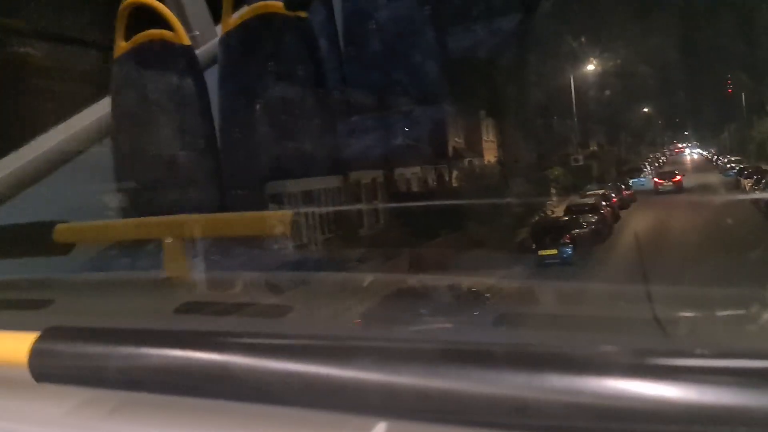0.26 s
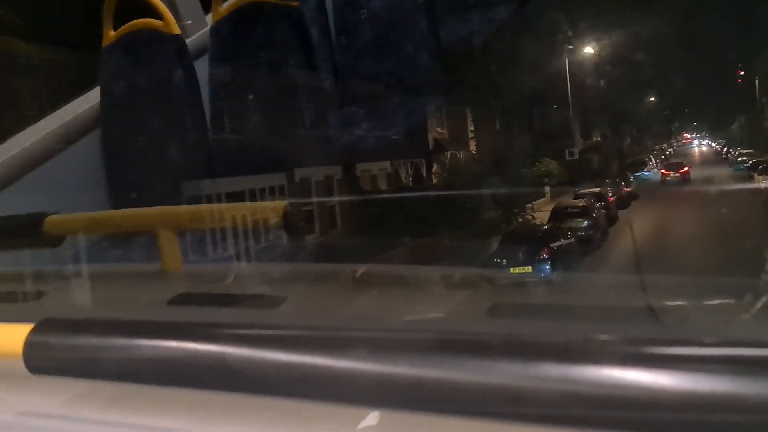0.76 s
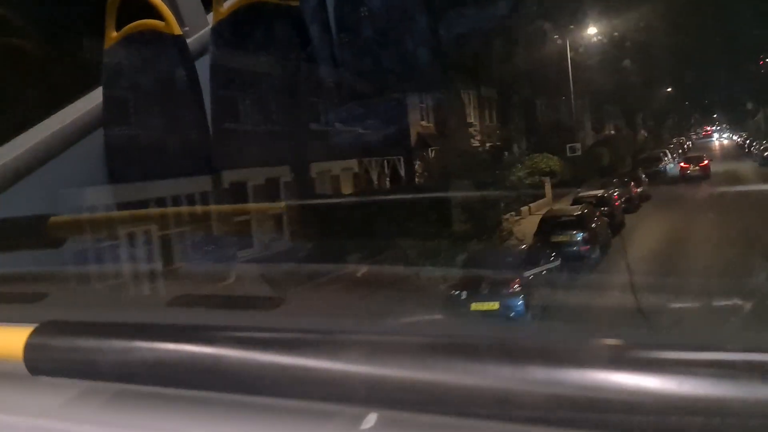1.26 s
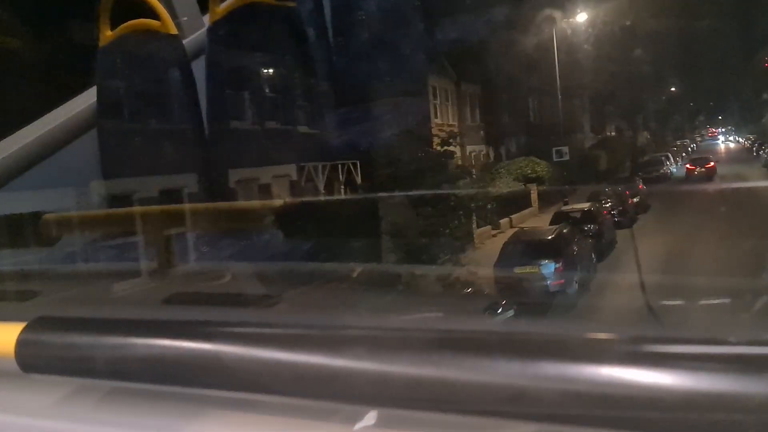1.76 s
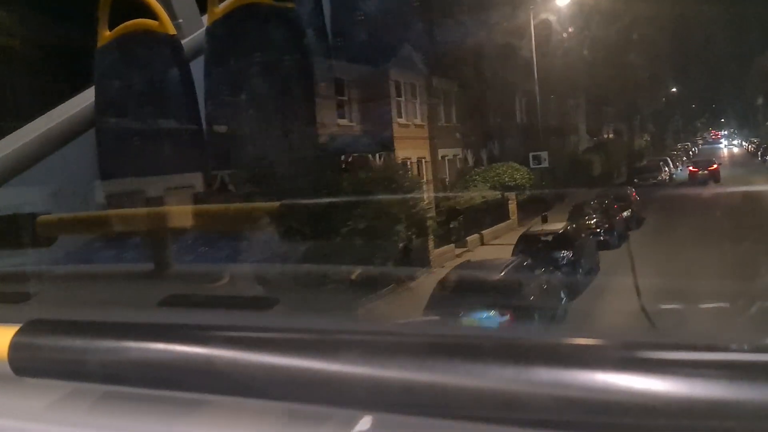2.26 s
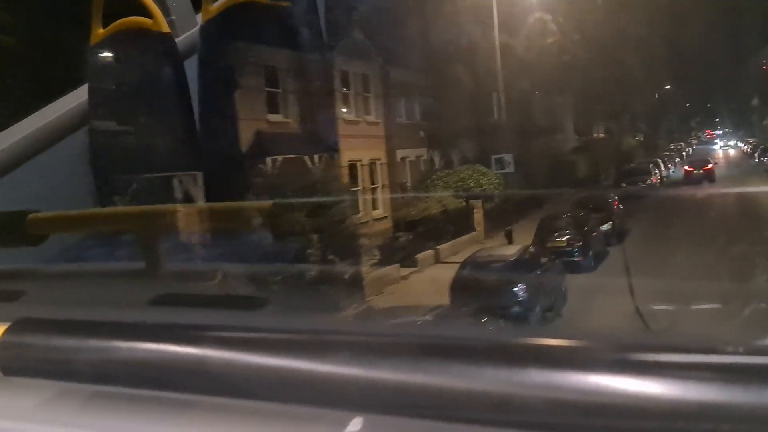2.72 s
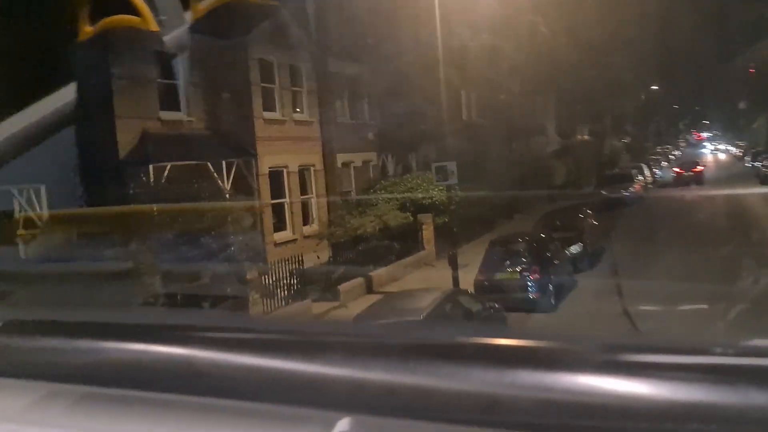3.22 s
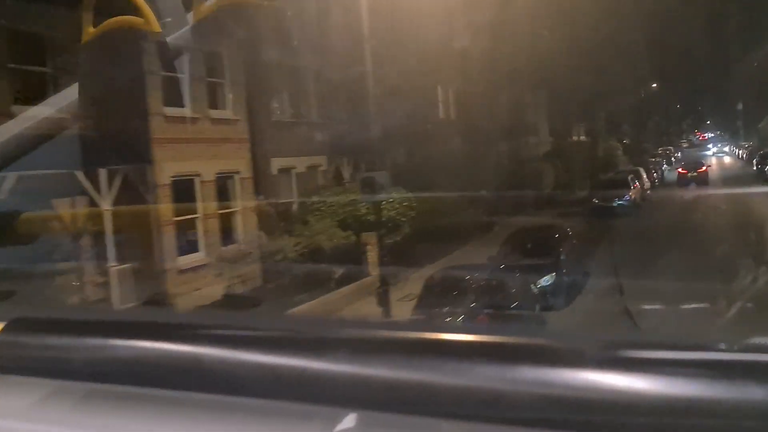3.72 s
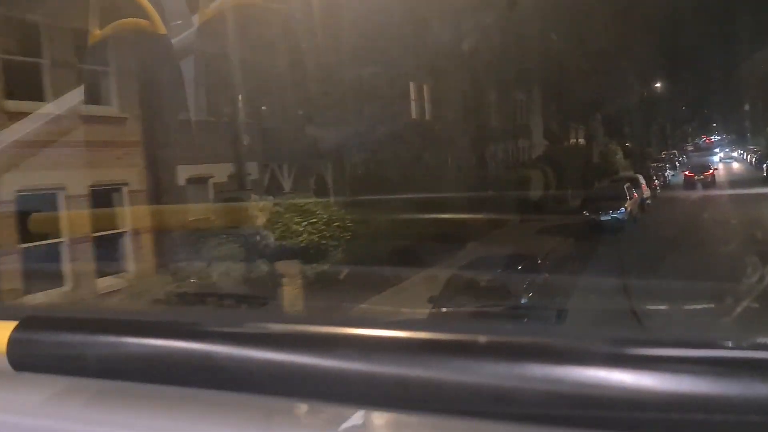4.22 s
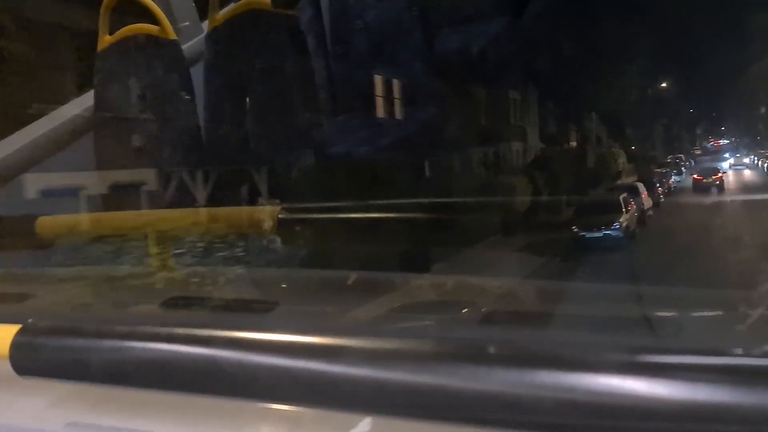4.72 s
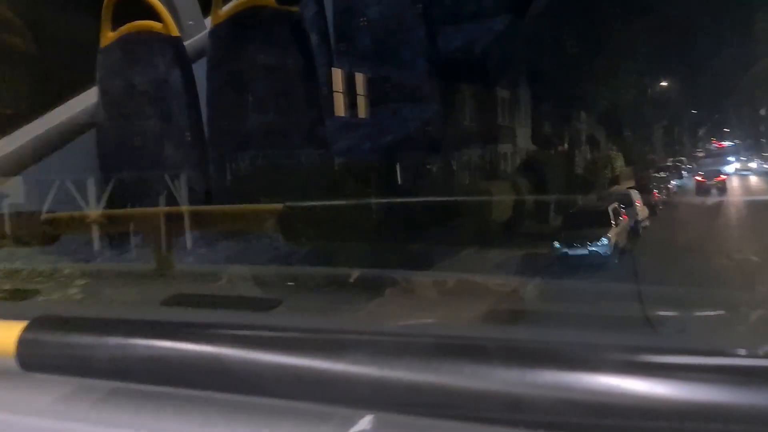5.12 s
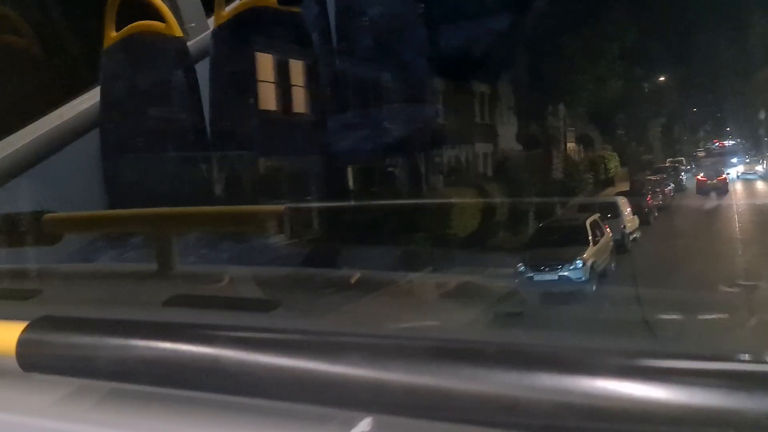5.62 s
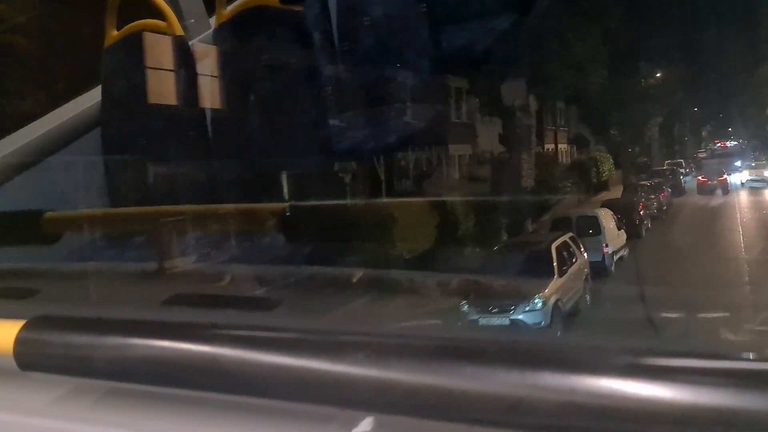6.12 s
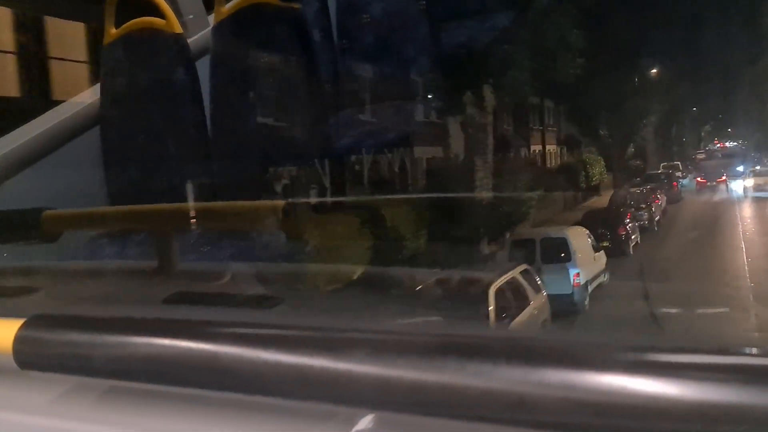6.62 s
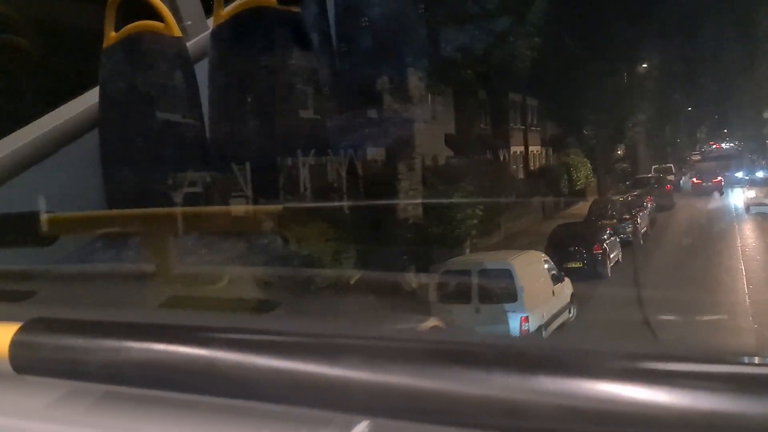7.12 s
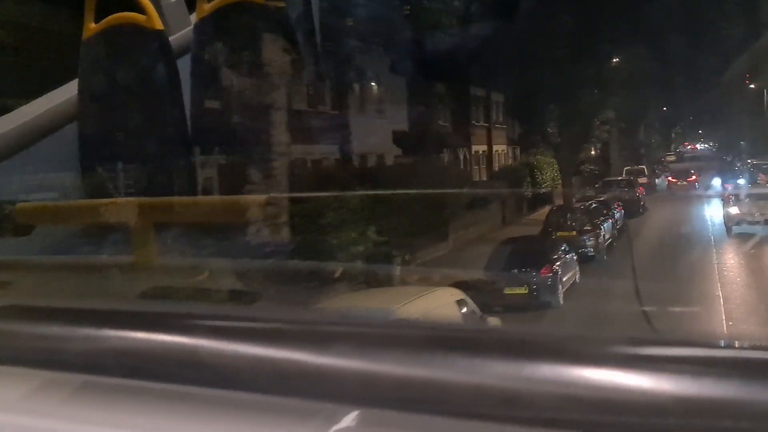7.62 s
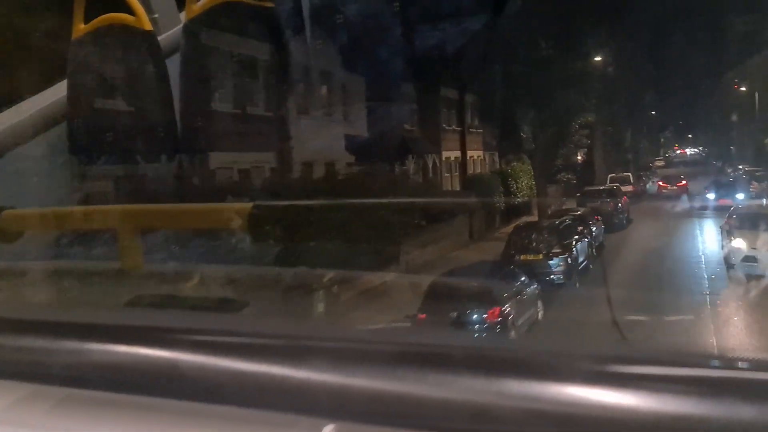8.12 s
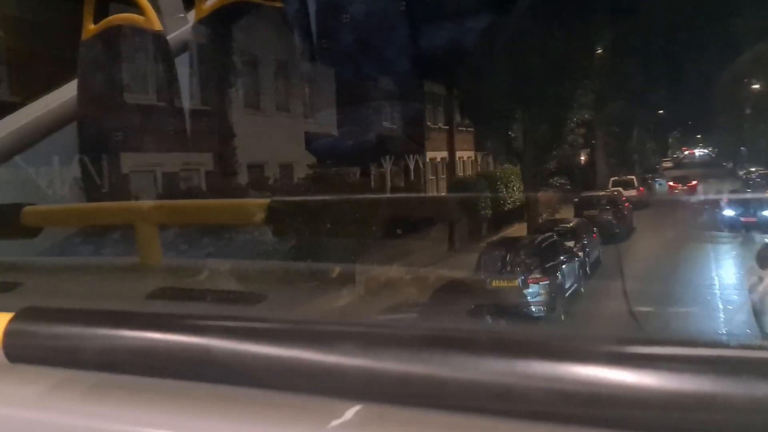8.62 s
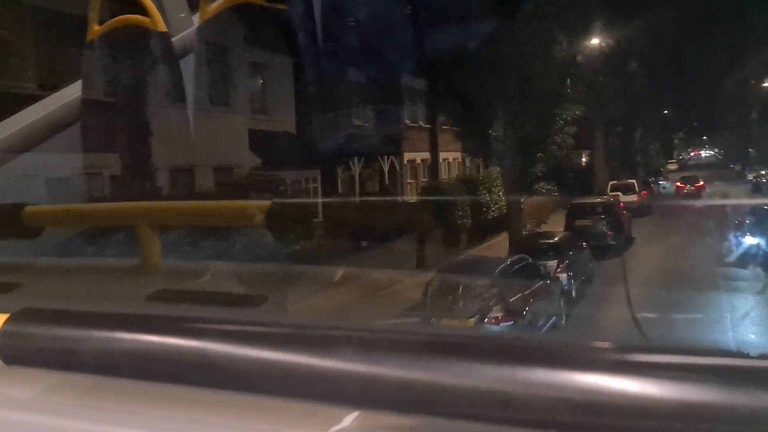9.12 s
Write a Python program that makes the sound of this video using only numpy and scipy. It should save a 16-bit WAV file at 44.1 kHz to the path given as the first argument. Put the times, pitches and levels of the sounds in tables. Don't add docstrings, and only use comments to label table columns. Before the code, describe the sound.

A bus engine and road rumble drone deep and steady inside the upper deck, pitch sagging in steps, with loose panels rattling and soft floor thuds.

```python
import sys
import numpy as np
from scipy import signal
from scipy.io import wavfile
from scipy.ndimage import uniform_filter1d

SR = 44100
rng = np.random.default_rng(int(sys.argv[2]) if len(sys.argv) > 2 else 0)


def dump_mix(stems):
    frames = np.atleast_2d(stems).T
    limited = np.clip(frames, -1, 1)
    pcm = np.round(limited * 32767).astype(np.int16)
    wavfile.write(sys.argv[1], SR, pcm)


def boost_factor(decibels):
    exponent = np.asarray(decibels, float) / 20
    return 10 ** exponent


N = 412776

# (time [s], firing rate [Hz], load [dB], cylinder unevenness [dB])
ENGINE_RUN = [(.15, 50.44, 0.5, -10), (.38, 46.9, -0.5, -14), (.9, 49.24, 0, 3), (1.35, 48.74, 0, -6),
              (1.7, 46.22, -0.5, -10), (2.0, 42.1, 0, -10), (2.62, 42.9, -0.5, -8), (2.9, 41.1, -2.5, -3),
              (3.22, 32.84, 4, -8), (3.55, 29.59, -1, -16), (3.95, 31.2, 4, -6), (4.8, 36.58, -4.5, -5),
              (6.15, 36.58, 2, -8), (6.58, 29.04, 0, -32), (7.1, 29.34, 1, -1), (7.5, 27.4, -0.5, -4),
              (9.0, 28.08, -4.5, 7), (9.36, 30.48, 2.5, 2.5)]
# (frequency [Hz], level [dB])
BODY_RESPONSE = [(15, -42), (24, -21), (30, -14.5), (35.5, -29), (41, -24), (46, -14), (50, -14),
                 (62, -24.5)]
# (multiple of firing rate [1], level [dB], share of unevenness [1])
ENGINE_ORDERS = [
    (.5, -10, 1),
    (1.5, -13, 1),
    (2, -12, .4),
    (3, -13, .6),
]
# (time [s], drone level [dB], panel buzz level [dB])
FAN_LEVELS = [(0, -25.5, -36), (.7, -27.5, -43.5), (1.4, -44, -53), (1.8, -25, -53), (2.3, -27, -36),
              (2.52, -33, -39), (2.95, -23.5, -39), (3.9, -26.5, -47), (5.2, -23, -44.5), (6.2, -23.5, -57),
              (6.7, -26, -36), (7.2, -22, -40), (8.0, -23.5, -37.5), (8.9, -25.5, -40.5),
              (9.36, -17.5, -51)]

# (time [s], force [dB], latch crispness [dB])
PANEL_RATTLES = [(.078, -38, -4), (0.238, -33.5, 2), (0.308, -42, 10.5), (.67, -34, 2), (.713, -37.5, -10),
                 (1.042, -35.5, 0), (1.3692, -34.5, 2), (3.05, -36, 3.5), (3.083, -46.5, -3),
                 (3.138, -39.5, 4), (3.2886, -34.5, -5), (3.504, -36, 1), (3.631, -34.5, -1),
                 (4.762, -34, 2), (5.177, -39.5, 3), (5.415, -33.5, 3), (5.699, -36.5, -5), (5.967, -31, 1),
                 (6.639, -41, 1), (7.278, -31, 2.5), (7.996, -44, -4), (8.0721, -34, 0),
                 (8.4193, -35.5, -2), (8.675, -38, -1), (8.782, -34.5, 2)]
# (time [s], force [dB], latch crispness [dB])
FLOOR_BUMPS = [
    (1.12, -29, 2),
    (2.838, -25.5, -8),
    (6.314, -30, 2),
    (6.573, -28, 13),
    (9.0193, -30, -1),
]
# (time [s], force [dB], latch crispness [dB])
LIGHT_CLICKS = [
    (2.2494, -41, -1),
    (7.4979, -47, -1),
    (8.3104, -44, 1),
]
# (panel [dB], floor [dB], latch over force [dB], chatter length [s])
STRIKE_KINDS = [
    (-2.5, 3, -16.5, 0.028),
    (-16.5, -2.5, -38, .022),
    (-9, -3, -7, 0.0025),
]
# (frequency [Hz], width [Hz], level [dB])
PANEL_MODES = [(1437, 35, -3), (1830, 110, 1), (2170, 90, 2), (2475, 50, -3), (3010, 200, -3),
               (3950, 300, -8), (5220, 200, -5), (6650, 600, -8)]
# (frequency [Hz], width [Hz], level [dB])
FLOOR_MODES = [(239.3, 28, 9), (347.5, 12, 3.5), (560, 210, -11), (696, 114, -6.5), (850, 31, -22)]
STRIKE_PANS_DB = [-4.5, -3.5]
# (frequency [Hz], level [dB])
LATCH_SPECTRUM = [(2500, -20), (4500, 6), (7000, 4), (8800, -1), (11000, 0), (13000, 0), (14800, -1),
                  (15800, -3)]

# (pitch [Hz], waver [Hz], level [dB], flutter [dB],
# left minus right [dB])
FITTING_RINGS = [(323, 7, -50.5, 2, -2), (570, 7, -65, 3, -9), (2429, 5, -65, 1, 3), (3020, 10, -65, 2, -3),
                 (3416, 8, -66.5, 2.5, -6), (3917, 10, -67.5, 2.5, -4),
                 (823, .5, -62.5, .6, 0),
    (3495, 5, -59.5, 1.5, 0),
]

# (time [s], roughness [dB])
ROAD_ROUGHNESS = [(0, 3), (.3, 3.5), (.49, 7), (.62, 2), (1.0, 6), (1.8, 0), (2.55, 2.5), (2.71, 3.5),
                  (2.92, 0), (3.13, 5), (4.0, -7.5), (4.45, 2), (4.95, -10), (5.05, 2.5), (5.85, -2.5),
                  (6.5, 3), (8.0, 0), (9.1, 1)]
# (time [s], airflow [dB])
VENT_FLOW = [(0, 0.5), (1.8, -1), (4.3, -0.4), (6.6, 1.07), (9.36, 1.5)]
# (frequency [Hz], density [dB per Hz])
RUMBLE_SPECTRUM = [(8, -24), (13, -14), (18, 0), (24, 4), (32, 6), (42, 0), (55, -3), (70, -1), (92, -3),
                   (108, -9), (135, -16), (170, -40), (260, -120)]
# (frequency [Hz], density [dB per Hz])
ROAR_SPECTRUM = [(65, -20), (110, -7.5), (134, -9.5), (177, -8.5), (265, -20), (329, -18), (458, -27.5),
                 (581, -26), (1300, -40), (1690, -81), (2860, -120)]
# (frequency [Hz], density [dB per Hz])
HISS_SPECTRUM = [(590, -9.5), (1000, -1.5), (1400, -2.5), (1760, 0.5), (1990, -2.5), (2700, -1.5),
                 (2970, 1), (3270, -1), (3530, 1.5), (3750, -1.5), (5360, -5.5), (5800, -7.5), (6610, -3),
                 (8000, -16.5), (10400, -52), (17600, -120)]
# (frequency [Hz], density [dB per Hz])
AIR_SPECTRUM = [(6000, -30), (8300, 0), (9500, 0), (11200, 1), (12800, -1), (13800, -3), (14500, -3),
                (15000, -8), (15700, -18)]
# (frequency [Hz], coherence [0-1])
PORT_COHERENCE = [(60, 1), (130, 1), (290, 0.85), (640, 0.46), (1200, 0.29), (3000, 0), (7000, 0.16),
                  (15000, 0.2)]
# (frequency [Hz], left minus right [dB])
PORT_BALANCE = [(60, 0.5), (110, -0.5), (200, -3), (380, 5.5), (700, 0.5), (1290, -2.5), (2380, -5.5),
                (4400, -0.5), (8120, -2), (15000, -10)]


def unit_power(x):
    return x / np.sqrt(np.mean(x ** 2) + 1e-20)


def read_spectrum(points, hz):
    f_hz, value = np.transpose(points)
    return np.interp(np.log(hz + 1), np.log(f_hz + 1), value)


def curves(rows):
    time_s, *columns = np.transpose(rows)
    return [np.interp(np.arange(N) / SR, time_s, column) for column in columns]


def wander(smooth_s):
    size = max(int(smooth_s * SR / 8), 1)
    at = np.arange(0, N + 8, 8)
    slow = uniform_filter1d(rng.standard_normal(len(at)), size)
    slow = uniform_filter1d(slow, size)
    return np.interp(np.arange(N), at, unit_power(slow))


def phase(hz):
    return 2 * np.pi * np.cumsum(hz) / SR


def panned(x, left_db):
    return x * boost_factor(np.array([[left_db / 2], [-left_db / 2]]))


def port_noise(spectrum, size, patchy_db):
    hz = np.fft.rfftfreq(size, 1 / SR)
    frames = N // (size // 4) + 5
    a, b, c, d, patches = rng.standard_normal((5, len(hz), frames), dtype=np.float32)
    patches = uniform_filter1d(patches, 12, 0)
    patches = unit_power(uniform_filter1d(patches, 6, 1))
    same = np.clip(read_spectrum(PORT_COHERENCE, hz), 0, 1)[:, None]
    left = a + 1j * b
    right = same * left + np.sqrt(1 - same ** 2) * (c + 1j * d)
    port_delay_s = 0.000441
    lag = np.exp(-2j * np.pi * np.maximum(hz - 600, 0) * port_delay_s)[:, None]
    tilt = boost_factor(read_spectrum(PORT_BALANCE, hz) / 2)[:, None]
    level_db = read_spectrum(spectrum, hz)[:, None] + patchy_db * patches
    z = np.array([left * tilt, right * lag / tilt]) * boost_factor(level_db)
    x = signal.istft(z, nperseg=size, noverlap=size * 3 // 4)[1][:, :N]
    return x / np.sqrt(np.mean(x.mean(0) ** 2))


def engine():
    firing_hz, load_db, uneven_db = curves(ENGINE_RUN)
    turns = phase(firing_hz)
    out = boost_factor(read_spectrum(BODY_RESPONSE, firing_hz) + load_db) * np.cos(turns)
    for order, order_db, share in ENGINE_ORDERS:
        level_db = order_db + read_spectrum(BODY_RESPONSE, order * firing_hz)
        level_db = level_db + share * uneven_db + 1.5 * wander(0.15)
        start = 2 * np.pi * rng.random()
        out = out + boost_factor(level_db) * np.sin(order * turns + start)
    return np.sqrt(2) * out


def fan():
    fan_hz = 83.85
    drone_db, buzz_db = curves(FAN_LEVELS)
    turns = phase(fan_hz + 0.19 * wander(0.29))
    drone = boost_factor(drone_db + 1.4 * wander(0.07)) * np.sin(turns)
    buzz = boost_factor(buzz_db + 3.1 * wander(0.12)) * np.sin(2 * turns + 0.93 * wander(0.093))
    return np.sqrt(2) * (drone + buzz)


def resonate(x, hz, width_hz):
    r = np.exp(-np.pi * max(width_hz, 1) / SR)
    return signal.lfilter([1 - r, 0, r - 1], [1, -2 * r * np.cos(2 * np.pi * hz / SR), r * r], x)


def ring_modes(hits, modes):
    return sum(boost_factor(db) * resonate(hits, hz, width_hz) / np.sqrt(width_hz) for hz, width_hz, db in modes)


def strike_drives():
    drives = np.zeros((3, N))
    t = np.arange(int(0.25 * SR)) / SR
    rise_s = np.array([[0.0003], [0.008], [0.0003]])
    linger = np.array([[0.8], [1.2], [1.2]])
    tail = boost_factor(np.array([[-12], [-14], [-11]]) - 60 * t / 0.45)
    first = 1 + np.array([[3.2], [0], [1.6]]) * np.exp(-t / 0.0025)
    for rows, kind in zip((PANEL_RATTLES, FLOOR_BUMPS, LIGHT_CLICKS), STRIKE_KINDS):
        panel_db, floor_db, latch_db, chatter_s = kind
        chatter = 1 / (1 + np.exp(np.clip((t / chatter_s - linger) / 0.5, -50, 50)))
        shape = (chatter * first + tail * chatter_s / 0.019) * np.minimum(t / rise_s, 1)
        for time_s, force_db, crisp_db in rows:
            levels_db = force_db + np.array([panel_db, floor_db, latch_db + crisp_db])
            part = drives[:, round(time_s * SR):][:, :len(t)]
            part += (boost_factor(levels_db)[:, None] * shape)[:, :part.shape[1]]
    return drives


def rattles():
    drives = strike_drives()
    knocks = boost_factor(1.8 * np.maximum(wander(0.0021), -0.5))
    out = np.zeros((2, N))
    bodies = zip(drives, (PANEL_MODES, FLOOR_MODES), (-7, -5), STRIKE_PANS_DB, (0.3, 1.5))
    for drive, modes, trim_db, left_db, shared in bodies:
        hits = rng.standard_normal((2, N)) + shared * rng.standard_normal(N)
        unit = ring_modes(hits[:, :SR], modes).std()
        body = ring_modes(hits * drive * knocks, modes)
        out += panned(boost_factor(trim_db) * body / unit, left_db)
    dull = signal.sosfilt(signal.butter(4, 7600, fs=SR, output="sos"), out)
    tick = boost_factor(-4) * port_noise(LATCH_SPECTRUM, size=256, patchy_db=2.5)
    return dull + tick * drives[2] * np.sqrt(knocks)


def rings():
    out = np.zeros((2, N))
    for hz, waver_hz, level_db, flutter_db, left_db in FITTING_RINGS:
        turns = phase(hz + waver_hz * wander(0.0297))
        apart = np.array([[1], [-1]]) * hz / 2500 * wander(0.067)
        tone = np.sqrt(2) * np.sin(turns + apart)
        flutter = wander(0.023) + 0.6 * wander(0.2)
        out += panned(tone, left_db) * boost_factor(level_db + flutter_db * flutter)
    return out


def road():
    rough_db, = curves(ROAD_ROUGHNESS)
    flow_db, = curves(VENT_FLOW)
    flicker_db = 0.5 * wander(0.017)
    rumble_db = -26.5 + rough_db + 1.0 * wander(0.06)
    roar_db = -36.5 + 0.24 * rough_db
    hiss_db = -46.5 + flow_db + flicker_db
    air_db = -63.5 + 1.35 * flow_db + flicker_db
    rumble = boost_factor(rumble_db) * port_noise(RUMBLE_SPECTRUM, size=8192, patchy_db=1.5)
    roar = boost_factor(roar_db) * port_noise(ROAR_SPECTRUM, size=2048, patchy_db=1.5)
    hiss = boost_factor(hiss_db) * port_noise(HISS_SPECTRUM, size=1024, patchy_db=0.82)
    air = boost_factor(air_db) * port_noise(AIR_SPECTRUM, size=1024, patchy_db=0.5)
    return rumble + roar + hiss + air


def scene():
    bass = panned((engine() + fan())[None], left_db=0.44)
    return bass + rattles() + rings() + road()


def roll_off(x):
    return signal.sosfilt(signal.butter(12, 15830, fs=SR, output="sos"), x)


def record(dry):
    low_cut = signal.butter(2, 9, "high", fs=SR, output="sos")
    band_limit = signal.firwin(1023, 15760, window=("kaiser", 9), fs=SR)
    mix = signal.sosfilt(low_cut, dry)
    mix = signal.oaconvolve(mix, band_limit[None], "same")
    return roll_off(mix)


dry = scene()
out = record(dry)
dump_mix(out)
```